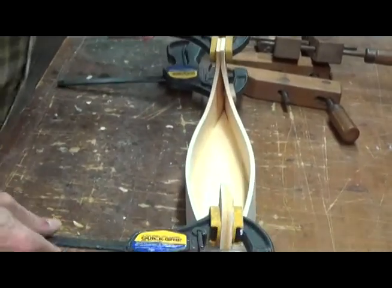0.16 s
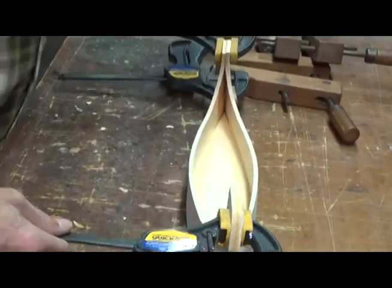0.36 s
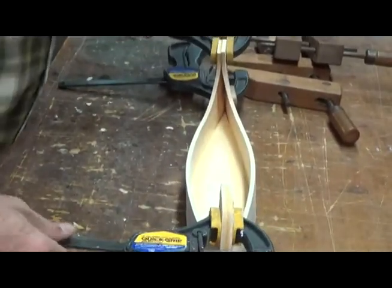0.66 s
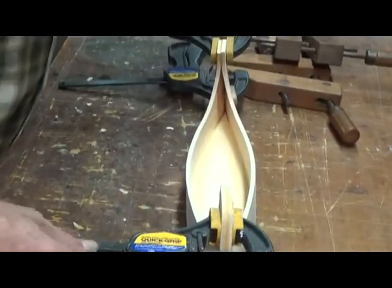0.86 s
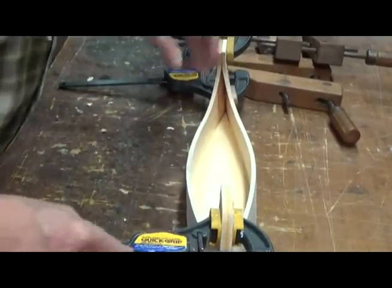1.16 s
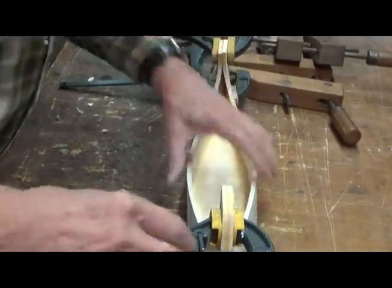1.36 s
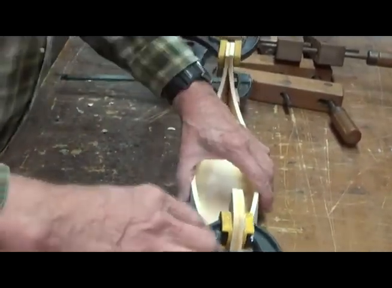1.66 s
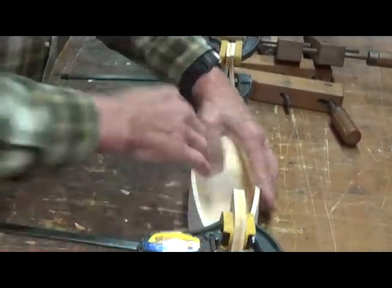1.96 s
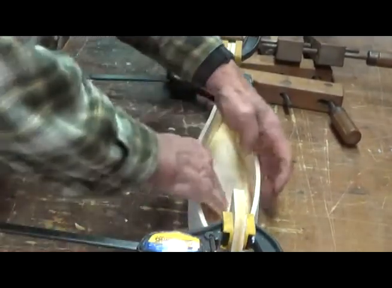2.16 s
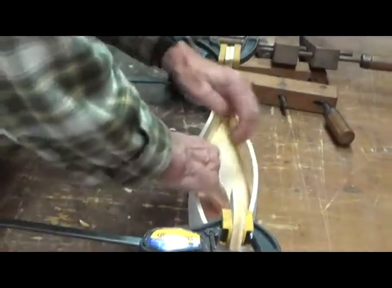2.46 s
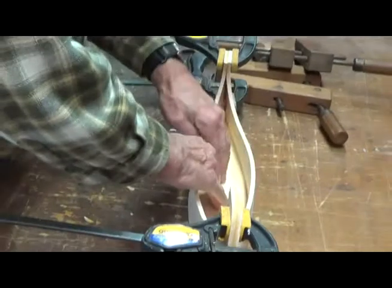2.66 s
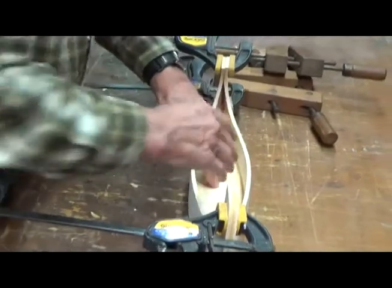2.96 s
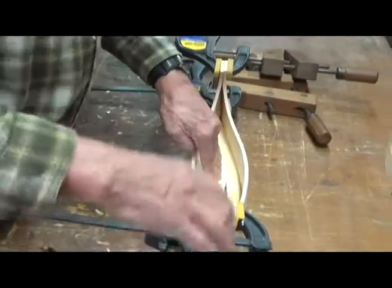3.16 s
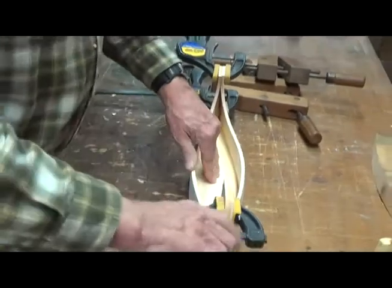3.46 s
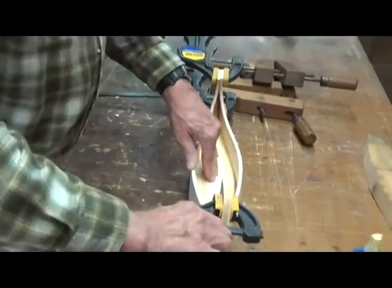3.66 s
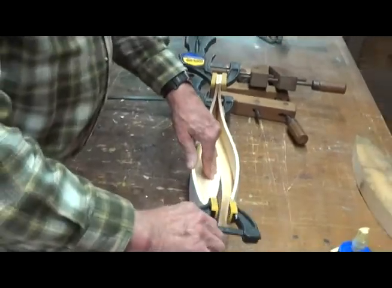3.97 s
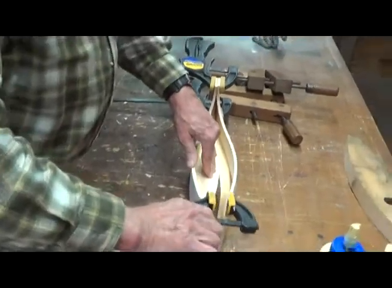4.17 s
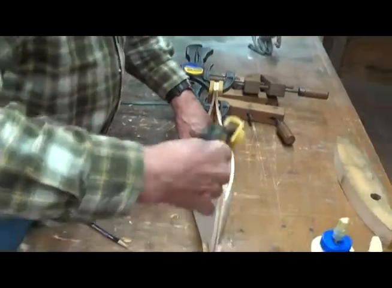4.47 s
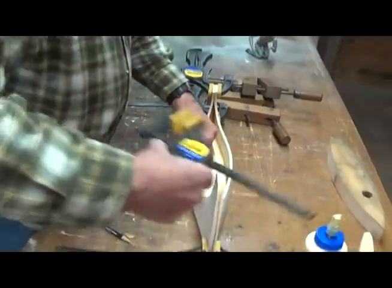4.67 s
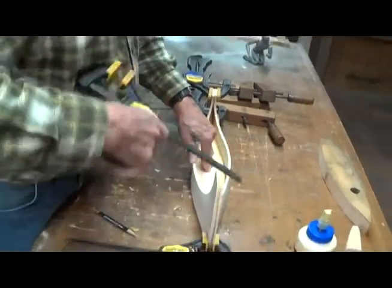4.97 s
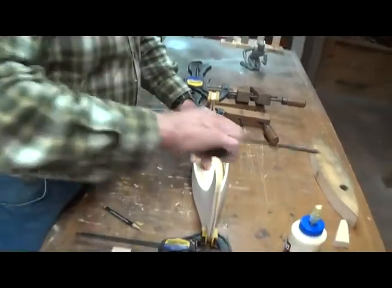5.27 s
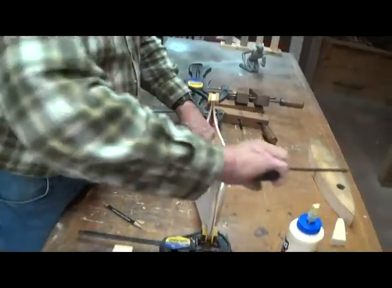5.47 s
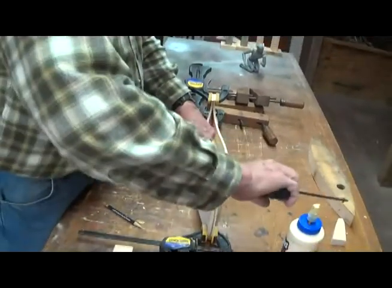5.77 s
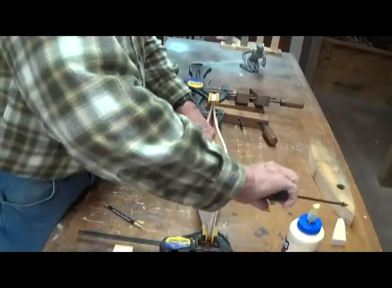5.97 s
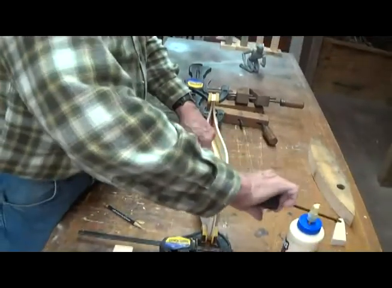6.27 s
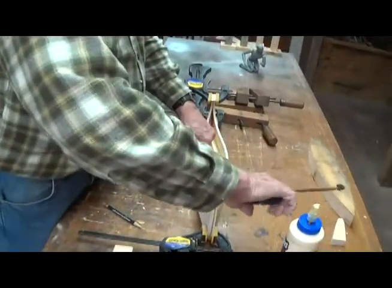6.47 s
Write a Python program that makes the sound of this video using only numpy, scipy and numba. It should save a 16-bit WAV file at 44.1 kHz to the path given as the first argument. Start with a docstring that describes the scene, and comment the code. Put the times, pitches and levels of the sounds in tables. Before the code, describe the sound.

A live workshop, heard close at the bench, with low rumble, soft hiss and faint mains hum. The echo of an earlier knock is dying at the start. A small tick at 0.3 s leads to a bright, hard clack of steel on wood at 0.5 s, with lesser clatters to 0.85 s. Light clicks and faint hand rubs run from 1.1 to 2.3 s. A thin distant bird whistles, trills from about 2.6 to 3.2 s, then chirps until 4.1 s. A sharp click and scrape come at 3.25 s, and the loudest crack, with long echo, at 3.83 s. Small woody knocks follow at 4.2 s, then sleeve rustle and dry chirpy squeaks from 4.5 to 5.1 s. After a lull, soft knocks from 5.65 s thicken into a rattle of ticks, a brief rasp and taps from 6.05 to 6.6 s.

```python
"""Workshop bench: bar clamps are dropped, slid and shifted around a small wooden hull.
Knocks excite decaying modes of bench, hull and steel bar; ticks, rasp and squeaks are shaped band noise.
Hands and sleeves rub as grains of noise, the bar scrapes as slips through resonances.
The shop answers with a late, dense echo by convolution with decaying noise; first wall echoes are struck too.
Mains hum, a high whine and a far bird are sines; room rumble and hiss are banded noise."""
import sys
import numpy as np
from scipy import signal
from scipy.fft import rfft, irfft
from scipy.io import wavfile
from numba import njit

SR = 44100
rng = np.random.default_rng(int(sys.argv[2]) if len(sys.argv) > 2 else 0)


def wrap_up_sound(samples):
    """Save the sound to the file named by the first command line argument, as 16-bit audio."""
    columns = np.atleast_2d(samples).T
    # keep every value between -1 and 1, then stretch to whole-number steps
    tamed = np.clip(columns, -1, 1)
    steps = np.round(tamed * 32767).astype(np.int16)
    wavfile.write(sys.argv[1], SR, steps)


N = 291942   # samples


def from_db(db):
    """Logarithmic level: decibels to amplitude gain."""
    return 10 ** (np.asarray(db) / 20)


def rms_one(x):
    """Power normalisation: scale to rms 1."""
    return x / np.sqrt(np.mean(x ** 2) + 1e-20)


def at_hz(points, hz):
    """Spectral interpolation: read a curve on a log-frequency axis."""
    curve = np.array(points)
    return np.interp(np.log(hz), np.log(curve[:, 0]), curve[:, 1])


def band_filter(x, low_hz, high_hz):
    """Band limitation: a Butterworth filter passes low_hz to high_hz."""
    return signal.sosfilt(signal.butter(2, [low_hz, high_hz], "band", fs=SR, output="sos"), x)


def drift(rate_hz):
    """Random modulation: noise through two poles at rate_hz, rms 1, drawn every 40 samples."""
    r = np.exp(-2 * np.pi * rate_hz * 40 / SR)
    noise = rng.standard_normal(N // 40 + 2002)
    slow = signal.lfilter([1], [1, -2 * r, r * r], noise)[2000:]   # settled part
    return np.interp(np.arange(N) / 40, np.arange(len(slow)), rms_one(slow))


def ring(clicks, hz, t60):
    """Damped oscillation: a unit click starts a sine that falls 60 dB in t60 seconds."""
    r = from_db(-60 / (t60 * SR))
    w = 2 * np.pi * hz / SR
    return signal.lfilter([0, np.sin(w)], [1, -2 * r * np.cos(w), r * r], clicks + 1e-18)


def bands(size, likeness):
    """Interchannel correlation: half-octave noise bands mix a common and an opposed part."""
    edges = 25 * 2 ** np.arange(0, 9.6, .5)
    white = rng.standard_normal((2, 2, size))
    for k, (low, high) in enumerate(zip(edges, edges[1:])):
        centre_hz = np.sqrt(low * high)
        mid, side = band_filter(white[k % 2], low, high)
        alike = np.clip(at_hz(likeness, centre_hz), 0, 1)
        yield centre_hz, np.sqrt(1 + alike) * mid + np.sqrt(1 - alike) * side * [[1], [-1]]


def struck(modes, times, blow_db, damping=1, tilt_db=0):
    """Modal superposition: each blow excites every mode with its own random strength and a given tilt."""
    at = (np.array(times) * SR).astype(int)
    out = np.zeros(N)
    spread_db = rng.normal(0, 2.0 * damping, (len(at), len(modes)))
    for k, (hz, level_db, t60) in enumerate(modes):
        mode_db = blow_db + level_db + spread_db[:, k] + tilt_db * np.log2(hz / 1400)
        clicks = np.zeros(N)
        clicks[at] = (-1) ** k * from_db(mode_db)   # neighbouring modes in opposite polarity
        out += ring(clicks, hz, t60 * damping) / np.sqrt(damping)
    return out


def add(out, s, sound):
    """Linear superposition: mix a short sound in at s seconds."""
    i = int(s * SR)
    out[i:i + len(sound)] += sound[:N - i]


def burst(low_hz, high_hz, t60, noise, rise_ms=0):
    """Transient envelope: band noise rises, then decays exponentially; peak 1."""
    t = np.arange(len(noise)) / SR
    rise = np.minimum(1, (1000 * t + .02) / max(rise_ms, .02)) ** 2
    decay = from_db(-60 * np.maximum(t - rise_ms / 1000, 0) / max(t60, .002))
    x = band_filter(noise * rise * decay, low_hz, min(high_hz, 17000))
    return x / np.abs(x).max()


# Spectrum of the room noise, relative per hertz: pitch_hz, level_db
AIR_SPECTRUM = [(15, -42), (25, -16), (96, -6), (276, -15.5), (362, -3), (425, -8), (1930, -14),
                (2150, -16), (3790, -18), (4330, -47), (5100, -20.5), (14600, -26.5), (15800, -28)]
# Course of the room noise: start_s, rumble_level_db, hiss_level_db
AIR_COURSE = [(0.0, -55, -54.5), (0.94, -57.5, -56), (1.4, -59, -54), (3.41, -63, -57), (4.151, -62.5, -54),
              (4.57, -62, -56), (5.55, -61.5, -55.5), (6.03, -61.5, -55.5), (6.42, -62, -57),
              (6.62, -54, -48.5)]
# Correlation of the room noise: pitch_hz, left_right_likeness (0 to 1)
AIR_LIKENESS = [(60, 1), (180, 0.95), (550, 0.47), (1650, 0.049), (4970, 0.62), (12000, 1)]
# Mains hum and high whine, about which the level drifts: pitch_hz, level_db (rms)
HUMS = [(120, -72), (360.7, -68), (15735, -71)]


def air(patchy_db=3.0):
    """Noise spectrum: drifting bands form rumble and hiss, under steady-pitched hum and whine."""
    t = np.arange(N) / SR
    s, rumble_db, hiss_db = np.transpose(AIR_COURSE)
    layers = np.zeros((2, 2, N))   # rumble below 300 Hz, hiss above
    for hz, noise in bands(N, AIR_LIKENESS):
        wander_db = patchy_db * np.sqrt(min(1, 400 / hz)) * drift(6)
        layers[int(hz > 300)] += from_db(at_hz(AIR_SPECTRUM, hz) + wander_db) * noise
    out = sum(from_db(np.interp(t, s, db)) * rms_one(x) for db, x in zip((rumble_db, hiss_db), layers))
    for hz, db in HUMS:
        gain = np.sqrt(2) * from_db(db + 2.5 * drift(4))
        out += gain * np.sin(2 * np.pi * hz * t + .5 * drift(4))
    return out


# Reverberation time: pitch_hz, t60_s
ECHO_T60 = [(150, 0.96), (500, 0.45), (1200, 0.62), (3000, 0.57), (7000, 0.41), (14000, 0.35)]
# Echo spectrum, relative: pitch_hz, level_db
ECHO_SPECTRUM = [(150, -7.5), (500, 7), (1500, 2.5), (4000, -2.5), (12000, -6.5)]
# Correlation of the echo: pitch_hz, left_right_likeness (0 to 1)
ECHO_LIKENESS = [(150, 0.93), (600, 0.96), (2000, 0.56), (6000, 0.76), (12000, 1)]
EARLY_DB, WALL_S, WALL_RISE_S = -5.5, 0.021, 0.006   # near surfaces first, the walls answer later


def workshop(x):
    """Reverberant decay: convolution with noise that dies band by band, weaker until the walls answer."""
    t = np.arange(SR) / SR
    tail = sum(from_db(at_hz(ECHO_SPECTRUM, hz) - 60 * t / at_hz(ECHO_T60, hz)) * noise
               for hz, noise in bands(SR, ECHO_LIKENESS))
    early = np.clip(1 - (t - WALL_S) / WALL_RISE_S, 0, 1)
    tail *= from_db(EARLY_DB * early) * (t > .003)
    tail /= np.sqrt(np.sum(tail ** 2) / 2)
    return signal.fftconvolve(x[None], tail, axes=1)[:, :N]


# Modes of the bench as heard directly: pitch_hz, level_db, t60_s
BENCH = [(167.6, -11, 0.19), (209.2, -1, 0.15), (276, -4.5, 0.15), (334, -2.5, 0.21)]
# Modes of the wooden hull as heard directly: pitch_hz, level_db, t60_s
HULL = [(385, 1, 0.026), (401, -0.5, 0.075), (485, 0.5, 0.076), (525.6, 1, 0.089), (606.5, -2.5, 0.069),
        (712, -3.5, 0.044)]
# Modes of the steel bar as heard directly: pitch_hz, level_db, t60_s
BAR = [(866, -3.5, 0.051), (1011, -1, 0.026), (1179, -6, 0.071), (1293, -3, 0.042), (1434, -4, 0.021),
       (1564, -3.5, 0.053), (1620, 4.5, 0.011), (1936, -1.5, 0.029), (2120, -2, 0.014), (2540, -8, 0.023),
       (2830, -16.5, 0.017), (3470, -8.5, 0.0098), (3360, 0.5, 0.0046), (4670, -9, 0.0018)]
# One blow before the start: bench_level_db, hull_level_db, bar_level_db
EARLIER_BLOW = (-64, -39, -25.5)
SPREAD_DAMPING = .3   # heard from all sides the modes blur: base share of ring time in the echo


def earlier_knock():
    """Residual reverberation: only the echo of a knock 40 ms before the start is heard."""
    blow = sum(struck(body, [0], db, SPREAD_DAMPING) for body, db in zip((BENCH, HULL, BAR), EARLIER_BLOW))
    lead = int(.04 * SR)
    return np.roll(workshop(blow), -lead, axis=1) * (np.arange(N) < SR)


# Small ticks of trigger and jaw: start_s, level_db (peak), pitch_hz, width_octaves (above the pitch)
TICKS = [(0.3065, -40, 2460, 1.6), (1.095, -37.5, 2330, .6), (1.1833, -33, 3320, 1.5),
         (1.728, -39, 2080, 0.47), (1.8395, -38.5, 4330, 0.31), (1.952, -33.5, 2680, 2),
         (1.9677, -33, 2800, 0.28), (2.038, -38.5, 3120, 0.91), (2.7229, -36.5, 2160, 0.62),
         (3.2315, -25, 3360, .4), (4.58, -35.5, 2120, .73), (4.8648, -37.5, 2070, 2.8),
         (5.1175, -43, 2010, 1.1), (5.432, -42, 3020, 0.36), (6.0715, -25, 2550, 1.2),
         (6.1286, -40, 5740, 0.68), (6.266, -35.5, 2580, 0.61), (6.3143, -37, 9330, 1.1),
         (6.337, -25.5, 3250, 0.26), (6.568, -32, 2800, 0.51), (6.6052, -27, 2400, 0.49)]
# One swelling rasp of the jaw: start_s, level_db (peak), pitch_hz, width_octaves (above the pitch)
RASP = (6.323, -27, 4200, 1.4)
TICK_T60_S, TICK_RISE_MS = 0.026, 0.73
RASP_T60_S, RASP_RISE_MS = .04, 11


def ticks():
    """Impulsive excitation: short dry noise snaps around their own pitch, and one slower rasp."""
    out = np.zeros(N)
    shapes = [(TICK_T60_S, TICK_RISE_MS)] * len(TICKS) + [(RASP_T60_S, RASP_RISE_MS)]
    noises = rng.standard_normal((len(shapes), 3000))
    for (s, db, hz, octaves), (t60, rise_ms), noise in zip(TICKS + [RASP], shapes, noises):
        snap = burst(hz / 2.2, hz * 2 ** max(octaves, .2), t60, noise, rise_ms)
        add(out, s, from_db(db) * snap)
    return out


# Knocks, and the first wall echoes of the hardest ones: start_s, crack_level_db, bench_level_db,
# hull_level_db, bar_level_db, bar_tilt_db_per_octave, room_level_db (before the send factor)
KNOCKS = [(0.3386, -43, -47, -59, -48, -7, -14), (0.504, -17, -54, -29, -15.5, 4, -11.5),
          (0.5089, -32, -38.5, -54, -22.5, 5, -6), (0.5139, -36, -68, -47, -19.5, 3.5, -1),
          (0.6343, -33, -58.5, -36, -24.5, 5, -7), (0.7587, -62, -43.5, -46, -33.5, -3.5, -4.5),
          (0.831, -30.5, -50, -43.5, -31, 4, -5.5), (1.1263, -34.5, -63, -49, -39.5, 6.5, -14),
          (1.6304, -43, -42, -55, -53, -5, -8), (3.265, -45, -77, -70, -47, 5, 1),
          (3.4443, -41, -50, -59, -47, 8, -0.5), (3.8348, -4, -46, -30.5, -16, 1.5, 5),
          (3.8599, -40, -32, -40, -27, -13, -4.5), (3.8674, -28, -51, -55, -25.5, -4, 5),
          (4.2258, -43, -47, -37.5, -62, -10, -4), (4.2645, -40, -63, -45, -41, 0, 0.5),
          (4.3214, -29, -42.5, -33.5, -54, -10, -7), (5.6549, -34.5, -33.5, -29, -34.5, 1, -9.5),
          (5.8394, -63, -44.5, -36.5, -52, -6, -11), (5.9194, -52, -54, -53, -51, -8, -24),
          (5.999, -55, -40.5, -38.5, -49, -16, -10), (6.0678, -53, -35, -34.5, -31.5, -3, -5.5),
          (6.1995, -46, -50.5, -47, -48, 2, -3), (6.3019, -55, -57, -41, -48, -3, -1.5),
          (6.3634, -31, -37.5, -34, -30.5, -8.5, -2), (6.3893, -29, -44, -49, -33.5, -5, -6.5),
          (6.407, -35, -44.5, -59, -40, 7, -2), (6.5117, -50, -44, -42.5, -41, -5, -17),
          (6.5285, -43, -42.5, -43.5, -40.5, -2, 1.5), (6.5444, -46, -43, -40.5, -36.5, 1, -20)]
KNOCK_LOW_HZ = 156   # knocks carry little below this
CRACK_OCTAVES, CRACK_WIDENS = 1.0, 0.061   # least width above 2800 Hz; octaves more per dB of lead over the bar


def knocks(send):
    """Modal excitation: knocks and first wall echoes sound all modes and a crack; send > 0 feeds the room."""
    s, crack_db, bench_db, hull_db, bar_db, tilt_db, room_db = np.transpose(KNOCKS)
    extra_db = room_db * send
    damping = SPREAD_DAMPING ** send
    out = struck(BENCH, s, bench_db + extra_db, damping)
    out += struck(HULL, s, hull_db + extra_db, damping)
    out += struck(BAR, s, bar_db + extra_db, damping, tilt_db)
    noises = rng.standard_normal((len(s), 2000))
    if send:
        noises = np.tile(signal.unit_impulse(2000), (len(s), 1))   # one clean pulse: an even spectrum
    octaves = CRACK_OCTAVES + CRACK_WIDENS * np.maximum(crack_db - bar_db, 0)
    for when, db, width, noise in zip(s, crack_db + extra_db + 6 * send, octaves, noises):
        crack = burst(2800, 2800 * 2 ** width, .009, noise, .5 * (1 - send))
        add(out, when, from_db(db) * crack)
    return signal.sosfilt(signal.butter(3, KNOCK_LOW_HZ, "high", fs=SR, output="sos"), out)


# Rubbing strokes: start_s, rise_s, hold_s, hiss_level_db (skin and cloth), scrape_level_db (bar),
# scrape_pitch_hz
STROKES = [(1.198, 0.024, 0.068, -80, -62.5, 1020), (1.439, 0.029, 0.029, -56.5, -51.5, 1230),
           (1.763, 0.035, .02, -67, -61.5, 1950), (1.896, 0.046, .11, -63, -63.5, 2200),
           (2.151, 0.03, 0.046, -62, -61, 2120), (2.285, 0.042, 0.022, -64, -57.5, 1910),
           (2.84, 0.041, .06, -64.5, -62, 2050), (3.252, 0.017, 0.09, -53.5, -45, 1285),
           (3.327, 0.046, 0.056, -53.5, -53, 2430), (3.45, 0.022, 0.079, -65, -62.5, 2000),
           (4.112, 0.12, 0.094, -51, -51.5, 1120), (4.366, 0.064, 0.034, -55.5, -65, 1060),
           (4.454, 0.051, 0.026, -48.5, -59.5, 1870), (4.55, .03, 0.068, -57, -61, 1920),
           (4.675, 0.067, 0.058, -53, -62, 2110), (4.845, .1, 0.12, -48, -66, 2020),
           (5.241, 0.035, 0.028, -55.5, -66, 2000), (5.314, 0.019, 0.08, -59, -74, 980),
           (5.653, 0.022, 0.025, -57, -50.5, 3920), (5.97, 0.052, .08, -57, -71, 1210),
           (6.14, 0.045, 0.095, -57.5, -71, 1200), (6.283, .04, .03, -55.5, -60, 2070),
           (6.34, 0.02, 0.044, -54.5, -48.5, 1270), (6.466, 0.025, 0.042, -58, -66, 980)]
STROKE_RISE_DB, STROKE_FALL_DB_PER_S = 21, 153   # a stroke climbs by this much, holds, then fades


def strokes():
    """Energy addition: stroke gains sum as powers; the loudest scrape sets the centre pitch."""
    t = np.arange(0, N, 64) / SR
    s, rise_s, hold_s, hiss_db, scrape_db, hz = np.transpose(STROKES)[:, :, None]
    rise_s = np.maximum(rise_s, .005)
    climb_db = STROKE_RISE_DB * np.minimum((t - s) / rise_s - 1, 0)
    shape_db = climb_db - STROKE_FALL_DB_PER_S * np.maximum(t - s - rise_s - hold_s, 0)
    hiss = from_db(shape_db + hiss_db)
    scrape = from_db(shape_db + scrape_db)
    hiss_gain = np.sqrt(np.sum(hiss ** 2, axis=0))
    scrape_gain = np.sqrt(np.sum(scrape ** 2, axis=0))
    centre_hz = hz[scrape.argmax(axis=0), 0]
    return [np.interp(np.arange(N) / SR, t, c) for c in (hiss_gain, scrape_gain, centre_hz)]


@njit
def moving_resonance(x, hz, r, step):
    """Time-varying resonance: a two-pole filter whose centre moves."""
    y = np.zeros(len(x))
    for i in range(2, len(x)):
        y[i] = x[i] - x[i - 2] + 2 * r * np.cos(step * hz[i]) * y[i - 1] - r * r * y[i - 2]
    return y


# Spectrum of the rubbing hiss, relative per hertz: pitch_hz, level_db
HISS = [(1760, -35), (3000, -3), (3710, -2), (4500, 1), (7180, -1), (9850, 5.5), (15500, -11.5)]
# Resonances of the dragged clamp: pitch_hz, width_hz, level_db
SCRAPED = [(857, 4.9, 7), (1263, 170, 11), (1860, 25, 3), (2356, 46, 4), (2610, 250, 6.5), (3190, 39, 5),
           (3900, 840, 5), (4520, 50, 0)]


def rubbing(width_hz=240, grain_db=1.6, scrape_per_s=5000):
    """Friction excitation: fine grains hiss; coarser slips drive bar modes and a moving resonance."""
    hiss, scrape, centre_hz = strokes()
    grain_sizes = from_db(grain_db * np.minimum(rng.exponential(1, (2, N)), 5))
    grains = grain_sizes * rng.standard_normal((2, N))
    spectrum = from_db(at_hz(HISS, np.arange(1, N // 2 + 2) * SR / N))
    fine = irfft(rfft(grains[0]) * spectrum, N)
    slips = grains[1] * (rng.random(N) < scrape_per_s * from_db(3 * drift(25)) / SR)
    narrow = rms_one(moving_resonance(slips, centre_hz, np.exp(-np.pi * width_hz / SR), 2 * np.pi / SR))
    broad = rms_one(band_filter(slips, 600, 4000))
    # a resonance of the given width rings for 2.2 / width seconds
    steel = rms_one(sum(from_db(db) * np.sqrt(width) * ring(slips, hz, 2.2 / width)
                        for hz, width, db in SCRAPED))
    colour = .7 * narrow + .2 * broad + .8 * steel
    flicker = from_db([1.2 * drift(30), 1.5 * drift(30)])
    return hiss * flicker[0] * rms_one(fine) + scrape * flicker[1] * colour


# Thin far whistles, about which pitch and level waver: start_s, end_s, pitch_hz, level_db
WHISTLES = [(2.18, 2.41, 2396, -66), (2.41, 3.22, 2180, -67), (2.3, 2.5, 3200, -75),
            (3.585, 3.625, 2420, -61), (3.66, 3.69, 2420, -62), (3.72, 3.76, 2420, -61)]
# Trill: start_s, end_s
TRILL = [(2.56, 3.01), (3.045, 3.24)]
TRILL_HZ, TRILL_SWEEP_HZ, TRILL_PER_S, TRILL_DB = 4285, 125, 60.5, -60
# Falling chirps: start_s, pitch_hz (at the start)
CHIRPS = [(3.01, 4350), (3.1, 4350), (3.18, 4350), (3.265, 4400), (3.4, 4750), (3.48, 4350), (3.575, 4450),
          (3.638, 4550), (3.66, 4400), (3.762, 4450), (4.115, 4400)]
CHIRP_S, CHIRP_FALL_HZ, CHIRP_DB = .032, 480, -59


def bird():
    """Frequency modulation: a fast trill of small sweeps, falling chirps and thin wavering whistles."""
    t = np.arange(N) / SR
    singing = sum((t > start) & (t < end) for start, end in TRILL)
    beat = t * TRILL_PER_S % 1
    trill_hz = TRILL_HZ + TRILL_SWEEP_HZ * np.cos(2 * np.pi * beat)
    tone = np.sin(2 * np.pi * np.cumsum(trill_hz) / SR)
    pulse = .7 - .3 * np.cos(2 * np.pi * beat - .8)
    out = from_db(TRILL_DB) * singing * pulse * tone
    part = np.linspace(0, 1, int(CHIRP_S * SR))
    for s, hz in CHIRPS:
        chirp = np.sin(2 * np.pi * np.cumsum(hz - CHIRP_FALL_HZ * part) / SR)
        add(out, s, from_db(CHIRP_DB) * np.sin(np.pi * part ** 1.2) * chirp)
    for start, end, hz, db in WHISTLES:
        fade = np.clip(np.minimum(t - start, end - t) / .02, 0, 1)
        gain = fade * from_db(db + 2.0 * drift(42))
        out += gain * np.sin(2 * np.pi * np.cumsum(hz + 15 * drift(24.5)) / SR)
    return out


# Dry squeaks of the jaw on the bar: start_s, level_db (rms before the swell), pitch_hz
SQUEAKS = [(4.4932, -60, 2080), (4.542, -54, 1970), (4.598, -62, 1710), (4.6254, -51.5, 1880),
           (4.739, -53.5, 1760), (4.759, -51.5, 2150), (4.853, -49, 1960), (4.9125, -54, 1770),
           (4.946, -47.5, 1960), (4.99, -52, 2050), (5.03, -56, 1970), (5.041, -57, 2440),
           (5.106, -51.5, 2010), (5.2729, -58, 1880), (5.426, -59, 2270)]
SQUEAK_S = 0.034


def squeaks(width_hz=330):
    """Narrow-band friction noise: short half-sine swells around one pitch each."""
    out = np.zeros(N)
    swell = np.sin(np.pi * np.minimum(np.arange(6000) / SR / SQUEAK_S, 1))
    for (s, db, hz), noise in zip(SQUEAKS, rng.standard_normal((len(SQUEAKS), 6000))):
        narrow = band_filter(noise, hz - width_hz / 2, hz + width_hz / 2)
        add(out, s, from_db(db) * rms_one(narrow) * swell)
    return out


def scene():
    """Superposition of fields: near sounds a little left of centre, their dense echo and the background."""
    small = ticks() + squeaks() + rubbing()
    echo = workshop(knocks(send=0.88) + from_db(-15.0) * small)
    near = (knocks(send=0) + small) * from_db([[.3], [-.3]])
    return near + echo + earlier_knock() + bird() + air()


CUTOFF_HZ = 15900


def record(dry):
    """Band limitation: a steep elliptic low-pass removes the top."""
    return signal.sosfilt(signal.ellip(20, .5, 110, CUTOFF_HZ, fs=SR, output="sos"), dry)


dry = scene()
out = record(dry)
wrap_up_sound(out)
```